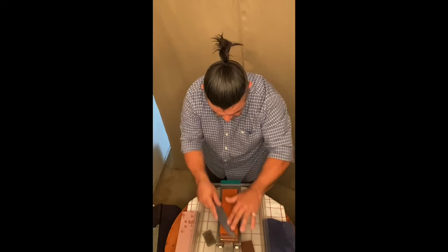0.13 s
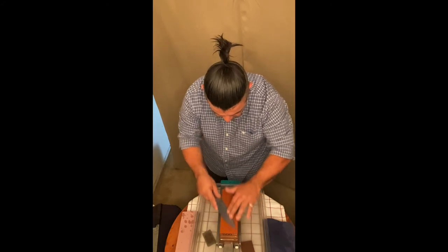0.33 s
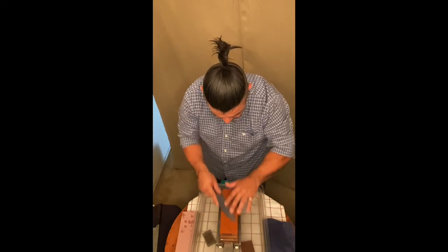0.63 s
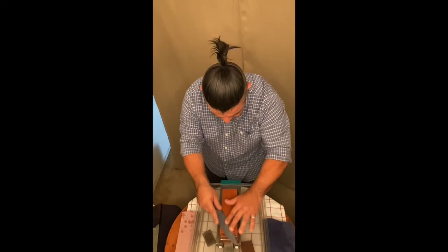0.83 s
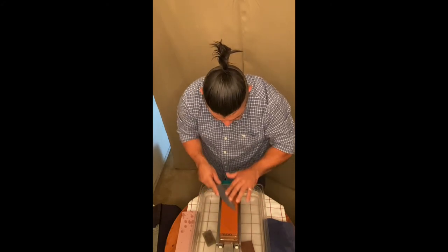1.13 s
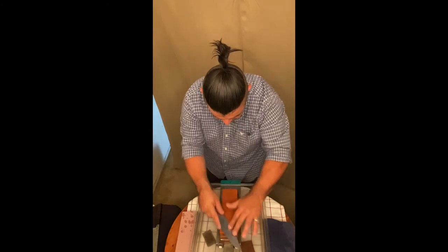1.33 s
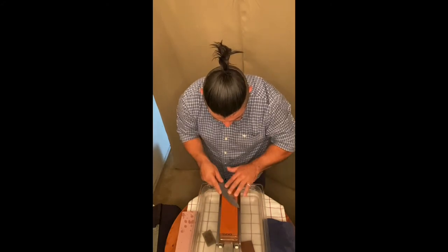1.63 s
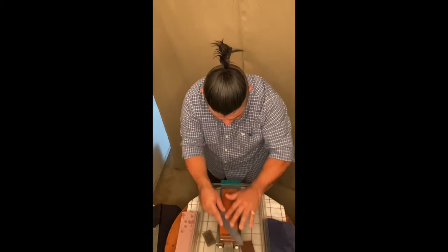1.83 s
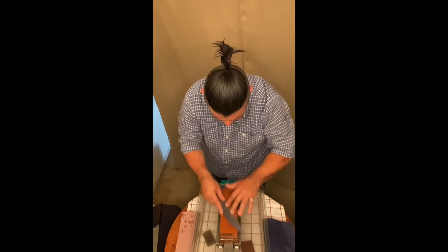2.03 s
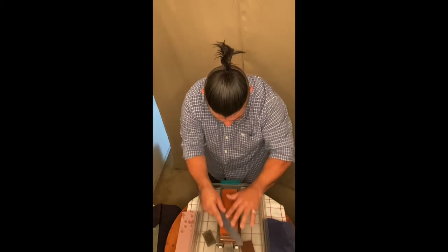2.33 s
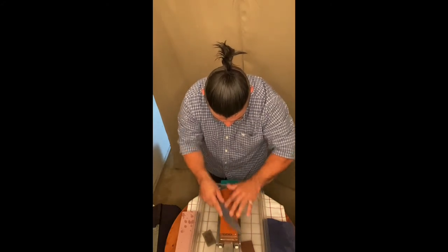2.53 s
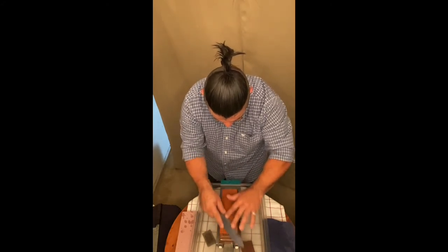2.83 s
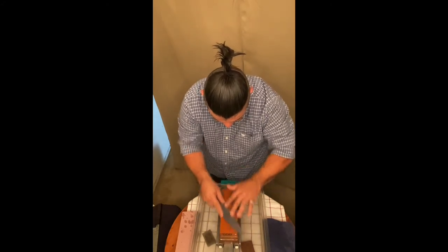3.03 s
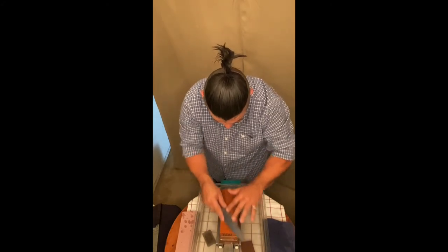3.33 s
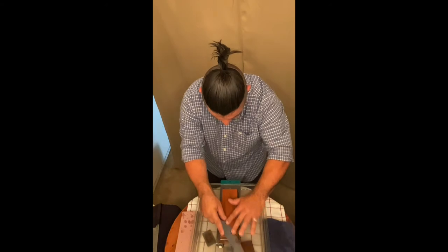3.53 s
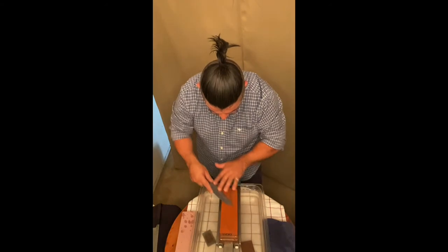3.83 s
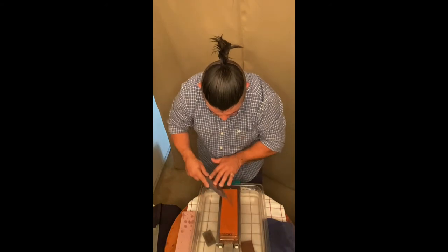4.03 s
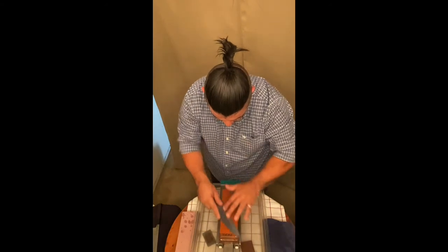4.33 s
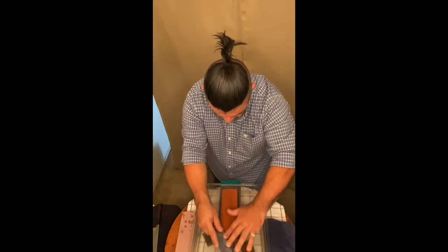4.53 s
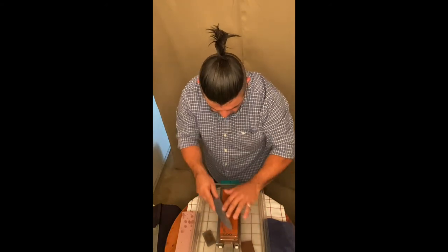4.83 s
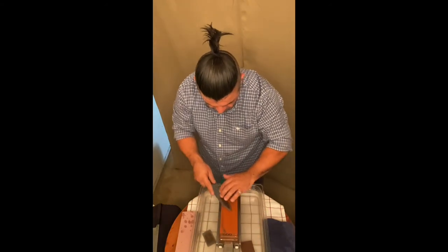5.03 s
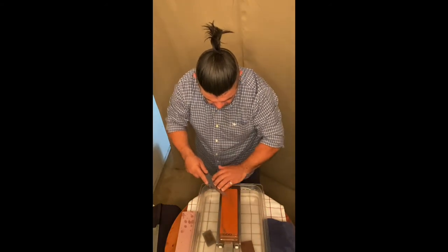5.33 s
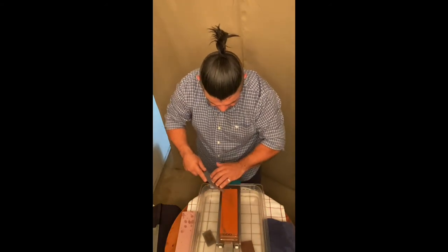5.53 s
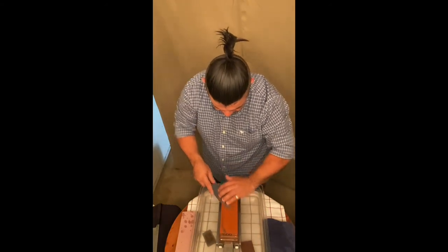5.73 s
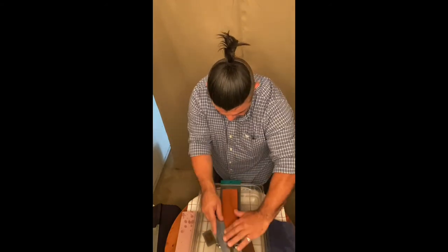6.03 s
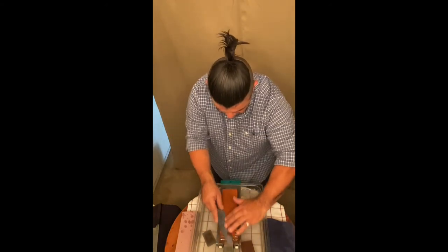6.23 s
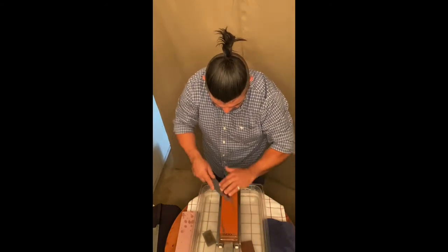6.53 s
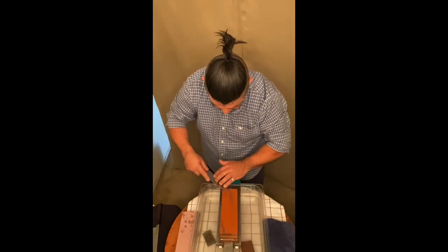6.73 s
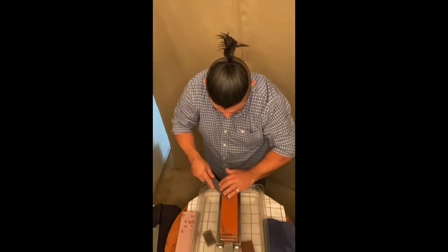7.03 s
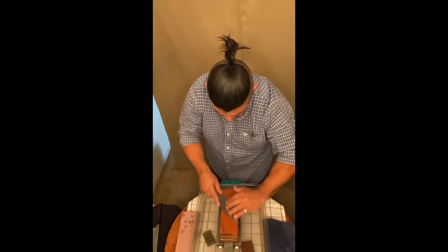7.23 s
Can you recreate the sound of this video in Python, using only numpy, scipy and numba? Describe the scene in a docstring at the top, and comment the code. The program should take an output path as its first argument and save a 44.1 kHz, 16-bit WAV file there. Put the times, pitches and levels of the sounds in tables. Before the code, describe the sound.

A close phone in a small indoor room hears a knife worked on a wet whetstone. From 0 to about 3.5 s the strokes come steadily, one every 0.25 to 0.3 s: bright gritty hiss, a wavering metallic ring around 3 to 5 kHz, tiny squeaks, and a brief dip at each turn. Soft stone knocks appear near 0.5, 1.8 and, more clearly, 3.5 s. Strokes loosen around 4 s, and the blade lifts at 4.6 s, leaving room hush and a very faint rustle. It lands at 5.1 s with a dull knock; slower, softer, duller-ringing strokes follow, roughly every 0.35 s, growing stronger by 7.1 s and continuing to the end at 7.4 s. Beneath, street rumble and a deep engine drone climb in pitch until nearly 7 s, then ease; a second, farther engine slows late. A faint low hum swells around 2.75 s.

```python
"""A knife edge hisses and rings over a wet whetstone, stroke after stroke, with one lift and landing.
Grit noise drives drifting blade modes and short squeaks; the stone knocks in its holder.
Behind: an engine speeds up and later eases, a second slows, street rumble fills the room's low modes.
Room noise, one faint rustle and one hum complete the scene; a phone with two ports hears it."""
import sys
import numpy as np
from scipy import signal
from scipy.fft import rfft, irfft
from scipy.io import wavfile
from scipy.ndimage import uniform_filter1d
from numba import njit

SR = 44100
rng = np.random.default_rng(int(sys.argv[2]) if len(sys.argv) > 2 else 0)


def materialize(psi):
    """Save the field psi as 16-bit PCM at rate SR to the path in sys.argv[1].

    A 1-D psi becomes a single channel; in a 2-D psi each row is a channel.
    """
    bounded = np.clip(np.atleast_2d(psi).T, -1, 1)
    quanta = np.round(bounded * 32767).astype(np.int16)
    wavfile.write(sys.argv[1], SR, quanta)


N = 325899
TIME_S = np.arange(N) / SR

# strokes, each from its opening turn: (time [s], halt depth [dB], slowing before the halt [s],
# hiss at start, middle, end [relative dB], ring at start, middle, end [relative dB],
# low blade modes [relative dB], hiss brightness: treble up and the rest down [dB])
STROKES = [(0, 0, 0, -52, -59.5, -47, -50, -62, -54, -4.5, 2.5),
           (0.207, 16, 0.046, -48.5, -59, -56, -62, -63, -58, 0, -7),
           (0.49, 15.5, 0.065, -54.5, -56.5, -54.5, -62.5, -57.5, -56.5, -2.5, 0.5),
           (0.793, 11, 0.02, -50, -60.5, -55.5, -60, -55, -52.5, -7.5, -5),
           (1.073, 10, 0.032, -52, -54.5, -51.5, -56, -58, -52, -1.5, 0),
           (1.352, 12, 0.017, -52, -57, -49, -58, -49, -53.5, -7.5, -5),
           (1.621, 11, 0.027, -49, -48.5, -54, -63, -50, -51.5, 2.5, 1.5),
           (1.902, 14, 0.014, -53.5, -54, -45, -52, -52.5, -54.5, 1.5, -2),
           (2.16, 15.5, 0.027, -49.5, -51.5, -55.5, -57, -62, -51, 1, -2.5),
           (2.406, 12, 0.023, -51.5, -57.5, -43.5, -56.5, -54, -53.5, -5, 1),
           (2.658, 13, 0.027, -48, -54.5, -56.5, -53, -55.5, -47, -0.5, -1),
           (2.908, 13, 0.02, -51.5, -51.5, -45.5, -50, -52.5, -54, -2, 1),
           (3.167, 13.5, 0.018, -46.5, -55, -56.5, -52, -66.5, -53.5, 7, 1),
           (3.482, 8, 0.03, -57.5, -53.5, -57.5, -51, -53, -56, -2, -5.5),
           (3.79, 1.5, 0.07, -58, -60, -53.5, -60, -60.5, -63.5, -1, 3),
           (3.976, 15.5, 0.064, -61, -61, -61, -60, -55, -65.5, -1, -5),
           (4.096, -2, 0.033, -54, -50, -60, -75, -51, -60, 0.5, 4),
           (5.075, 50, 0.078, -54.5, -54.5, -61, -61, -89, -57.5, 10, 4),
           (5.478, 22, 0.046, -71, -65.5, -59, -66.5, -63, -64, -1, 11.5),
           (5.71, 1, 0.055, -52, -52, -53.5, -61, -52, -54.5, 7, 5.5),
           (6.086, 18, 0.034, -54, -51.5, -55, -55, -53, -54.5, 2, -1.5),
           (6.405, 4, 0.035, -58.5, -53, -60, -59.5, -62.5, -60.5, 6, 3.5),
           (6.785, 16, 0.068, -69.5, -55.5, -53, -62.5, -71, -57.5, -2, -3),
           (7.106, 5, 0.047, -48, -54.5, -55, -52, -49, -51, -2, 4.5)]
# grit hiss colour: (frequency [Hz], density [relative dB per Hz])
GRIT_COLOUR = [(600, -19), (1800, -23.5), (3000, -13.5), (4000, -16.5), (5500, -5.5), (7000, -4.5),
               (10000, -1.5), (12500, -6), (14500, -8.5), (16000, -7)]
# modes of the blade under the fingers: (frequency [Hz], width [Hz], level [relative dB])
BLADE_MODES = [(1199, 66, -19), (2190, 57, -26), (2470, 81, -11), (2844, 88, -2), (3187, 170, 0.5),
               (3500, 180, 0), (3847, 56, -2.5), (4170, 180, 0.5), (4440, 43, 0), (5044, 33, -6),
               (6090, 370, -5.5)]
# edge catches, one mode sings: (centre time [s], length [s], pitch [Hz], level before its bell [dB])
SQUEAKS = [(0.125, 0.042, 3870, -57.5), (0.731, 0.031, 3970, -48.5), (1.326, 0.052, 3600, -55.5),
           (1.523, 0.027, 3550, -55), (1.767, .03, 4800, -51), (1.772, 0.032, 3000, -56),
           (1.88, 0.15, 1163, -60.5), (2.18, 0.038, 3330, -54), (2.55, 0.046, 3260, -48.5),
           (2.787, 0.041, 4436, -53), (3.035, 0.083, 4350, -59), (3.32, 0.058, 4480, -51.5),
           (3.455, 0.041, 3800, -51.5), (4.412, 0.06, 4510, -50.5), (2.46, 0.059, 2980, -54),
           (4.444, 0.055, 2410, -58), (0.045, 0.048, 5150, -56.5), (0.524, 0.016, 4150, -60),
           (1.095, 0.031, 5000, -58), (1.3, .04, 6300, -55), (1.594, 0.079, 3430, -57),
           (1.65, 0.022, 4420, -52), (2.072, 0.025, 2960, -52.5), (2.264, 0.08, 4380, -57),
           (2.387, 0.015, 4400, -54), (2.638, 0.044, 2910, -59), (2.67, 0.035, 3270, -58),
           (3.152, 0.063, 3000, -59.5), (3.11, 0.047, 5076, -71), (3.22, 0.071, 5040, -58),
           (3.48, 0.076, 2700, -60), (3.748, 0.04, 5080, -53), (4.32, 0.065, 4820, -56),
           (5.145, 0.039, 4700, -66), (5.262, 0.11, 4590, -65), (5.378, .06, 5520, -65),
           (5.53, 0.028, 5550, -63.5), (5.615, 0.042, 5700, -64), (5.854, 0.067, 4275, -56),
           (6.104, 0.016, 2310, -56.5), (6.114, .02, 2750, -60), (6.173, 0.025, 5360, -57),
           (6.225, 0.03, 4140, -54), (6.507, 0.038, 4530, -62), (6.594, 0.069, 5000, -58),
           (6.694, 0.04, 4995, -56.5), (7.06, 0.048, 4500, -63), (5.834, 0.053, 4865, -55),
           (7.27, 0.05, 4500, -58)]
# edge bites a coarser patch, whole rasp surges: (centre time [s], length [s], level [dB])
SURGES = [(0.115, 0.038, 7), (0.232, .025, 0), (0.52, .02, 1), (.813, 0.025, 1), (1.123, 0.031, 3.5),
          (1.31, 0.037, 0), (1.525, 0.016, 5.5), (1.583, .04, 2), (1.77, 0.053, 2), (2.123, .05, -0.5),
          (2.536, 0.039, 6), (2.715, 0.046, 3), (2.793, 0.038, 6.5), (3.049, 0.032, 5), (3.295, 0.072, 4.5),
          (3.519, 0.037, 3), (3.646, 0.024, 4), (4.181, 0.042, 5), (4.332, 0.068, 3), (4.42, 0.044, 2.5),
          (5.241, 0.041, 3), (5.665, .03, 2), (5.82, 0.082, 5), (6.186, .06, 1.5), (6.339, 0.027, 3),
          (6.493, 0.03, 3), (6.69, 0.041, 3.5), (7.225, 0.084, 4.5)]
# modes of stone and holder: (frequency [Hz], level [relative dB], t60 [s])
HOLDER_MODES = [(486, 7, 0.015), (737, -4.5, 0.039), (1297, -3.5, 0.058), (1604, -4, 0.022),
                (2120, -3.5, 0.0075), (2840, -0.5, 0.006)]
# stone shifts in the holder: (time [s], level [relative dB], rattle decay [s], pitch [Hz])
KNOCKS = [(0.513, -62, 0.013, 650), (0.8, -66.5, 0.028, 1480), (1.787, -63, 0.47, 850),
          (2.019, -72, 0.038, 900), (3.463, -55.5, 0.015, 597), (3.47, -63, 0.022, 1576),
          (3.484, -59, 0.034, 745), (4.004, -66.5, 0.037, 1575), (4.008, -61.5, 0.041, 752),
          (4.286, -70, 0.085, 1240), (5.088, -51, 0.016, 760), (5.091, -62, 0.009, 1325),
          (5.81, -57.5, 0.07, 870), (6.107, -69, 0.017, 2500), (6.343, -70, 0.072, 530),
          (6.634, -65, 0.07, 1866)]
# engine outside: (time [s], firing rate [Hz], level [dB])
ENGINE = [(0, 45.7, -51.5), (.8, 46.72, -72), (1.3, 48.23, -42.5), (1.8, 53.1, -37.5), (2.3, 54.58, -42),
          (2.9, 57.23, -44), (3.3, 64.34, -42), (3.8, 68.13, -43.5), (4.4, 71.02, -43), (5, 72.3, -47.5),
          (5.6, 73.75, -51), (6.2, 74.8, -57), (6.8, 77.4, -48.5), (7.1, 68.8, -47.5), (7.39, 68.3, -67)]
# second engine, further off: (time [s], firing rate [Hz], level [dB])
FAR_ENGINE = [(5.1, 72.1, -90.5), (5.7, 70, -63), (6.8, 66.3, -47.5), (7.1, 62.9, -75)]
# low room modes: (frequency [Hz], width [Hz], level [relative dB])
ROOM_MODES = [(46.74, 1.75, -4), (55, 4.5, -6.5), (58.83, 5.1, -3.5), (80.06, 0.73, -9.5)]
# street rumble: (time [s], level [dB])
RUMBLE_LEVEL = [(0, -52.5), (.6, -42), (1.2, -45.5), (3, -48), (4.5, -42.5), (5.2, -44.5), (6, -43),
                (6.6, -47.5), (7.39, -50)]
# room air colour: (frequency [Hz], density [relative dB per Hz])
AIR_COLOUR = [(50, -14), (85, -1.5), (108, -14), (140, -24), (181, -24.5), (280, -17.5), (347, -29),
              (535, -26), (584, -33.5), (650, -31.5), (1050, -37.5), (1840, -41), (6310, -64.5),
              (15000, -69)]
# microphone ports: (frequency [Hz], phase lead of the left [rad], likeness [0-1])
PORTS = [(100, 0, .997), (200, 0, .9), (350, 0, .72), (700, .5, .15), (1500, 0, .45), (2300, .3, .4),
         (3100, 2.8, .45), (3900, .5, .5), (5100, .7, .6), (6000, 1.7, .85), (7300, 3.14, .995),
         (10450, 6.28, .94), (12000, 7.85, .9), (13700, 9.42, .995), (16000, 12.1, .85)]

# strokes: rest after the turn, then time to regain speed; row that lands after the lift
HALT_S, PICKUP_S, LIFT_S, LANDING_ROW = 0.0067, 0.011, 4.58, 17
# the ring bridges part of the halt; share of the stroke where it has its middle level
RING_HALT_SHARE, RING_MIDDLE_SHARE = 0.56, 0.56
# the harder the blade rings over the hiss, the lower the contact centre
CONTACT_BASE_HZ, CONTACT_HZ_PER_DB = 4820, 35
# heel and tip: fingers hold the low modes; the middle is ground from MIDDLE_S to the lift
MIDDLE_S, OUTER_LOW_DB = 1.75, -2
# tip: narrow modes fade per octave of sharpness; modes wander more
TIP_DAMP_DB_PER_OCT, MODE_DRIFT_SHARE, TIP_DRIFT_SHARE = 5, 0.013, 0.025
# broad tip rasp, level relative to the ring
TIP_RASP_REL_DB, TIP_RASP_HZ, TIP_RASP_WIDTH_HZ = -12, 4490, 2800
# pitch over width; climb over one length as a share of pitch
SQUEAK_Q, SQUEAK_RISE_SHARE = 26, 0.027
# knock loss for modes above and below its pitch
KNOCK_ABOVE_DB_PER_OCT, KNOCK_BELOW_DB_PER_OCT = 14, 26
AIR_BASE_DB, AIR_RISE_DB_PER_S = -55, 0.35
AIR_SWELL_S, AIR_SWELL_LENGTH_S, AIR_SWELL_DB = 5.08, 1.45, 1
# rustle and hum levels are taken before their bells
RUSTLE_S, RUSTLE_LENGTH_S, RUSTLE_HZ, RUSTLE_BASE_DB = 4.82, 0.26, 4000, -81
HUM_S, HUM_LENGTH_S, HUM_HZ, HUM_BASE_DB = 2.75, 0.5, 255, -61.5
TOP_HZ = 15760


def undb(db):
    """Amplitude gain of a level in dB."""
    return 10 ** (np.asarray(db) / 20)


def level(x, db):
    """Set the rms in dB."""
    return x * undb(db) / np.sqrt(np.mean(x ** 2))


def curves(table):
    """Columns after time, interpolated to one value a sample."""
    time_s, *columns = np.transpose(table)
    return [np.interp(TIME_S, time_s, c) for c in columns]


def colour(x, spectrum):
    """Shape a spectrum, linear in dB over log frequency."""
    hz, db = np.transpose(spectrum)
    bins_hz = np.fft.rfftfreq(N, 1 / SR) + 1
    gain = undb(np.interp(np.log(bins_hz), np.log(hz), db))
    return irfft(rfft(x) * gain, N)


def ring(x, hz, width_hz):
    """One fixed resonance, gain 1 at its centre."""
    return signal.lfilter(*signal.iirpeak(hz, hz / width_hz, fs=SR), x)


@njit
def glide(x, hz, width_hz):
    """State-variable resonance with a moving centre, gain 1 there."""
    y, band, low = np.empty(len(x)), 0., 0.
    for i in range(len(x)):
        g = np.tan(np.pi * hz[i] / SR)
        k = width_hz / hz[i]
        v = (band + g * (x[i] - low)) / (1 + g * (g + k))
        band = 2 * v - band
        low = low + 2 * g * v
        y[i] = k * v
    return y


def walk(rate_hz):
    """Random levels held 1 / rate_hz, slewed twice; spread near 1."""
    k = int(SR / rate_hz)
    held = np.repeat(rng.standard_normal(N // k + 1), k)
    return 1.28 * uniform_filter1d(uniform_filter1d(held, k), k)[:N]


def swell(time_s, length_s):
    """Bell-shaped rise and fall."""
    return np.exp(-2 * ((TIME_S - time_s) / length_s) ** 2)


def ports(source):
    """Both ports hear the source; the right one later, and partly by other paths."""
    direct, other = rfft(source()), rfft(source())
    hz, lead_rad, likeness = np.transpose(PORTS)
    bins_hz = np.fft.rfftfreq(N, 1 / SR)
    lead_rad = np.interp(bins_hz, hz, lead_rad)
    likeness = np.clip(np.interp(bins_hz, hz, likeness), 0, 1)
    same = np.sqrt((1 + likeness) / 2) * direct
    apart = np.sqrt((1 - likeness) / 2) * other
    left, right = same + apart, (same - apart) * np.exp(-1j * lead_rad)
    return irfft(np.array([left, right]), N)


def knife():
    """Grit under the edge hisses and drives blade modes, strongest near a moving contact centre."""
    hiss_db, ring_db, low_db, bright_db, touching = strokes()
    contact_hz = CONTACT_BASE_HZ * (1 + 0.074 * walk(5.5))
    contact_hz = contact_hz - CONTACT_HZ_PER_DB * np.clip(ring_db - hiss_db, -15, 15)
    tip = TIME_S > LIFT_S
    low_db = low_db + OUTER_LOW_DB * (tip | (TIME_S <= MIDDLE_S))
    # fingers and contact travel along the blade: each mode swells and drifts by itself
    grips = []
    for hz, width_hz, db in BLADE_MODES:
        low_weight = max(1.67 * np.log2(4800 / hz) * (hz < 4000), 0)
        tip_loss_db = tip * TIP_DAMP_DB_PER_OCT * np.log2(hz / width_hz / 12)
        grips.append(undb(db + 2.85 * walk(24) + low_db * low_weight - tip_loss_db))
    drift = np.where(tip, TIP_DRIFT_SHARE, MODE_DRIFT_SHARE)
    tunings_hz = [hz * (1 + drift * walk(9)) for hz, _, _ in BLADE_MODES]
    surge = undb(sum(db * swell(s, length_s) for s, length_s, db in SURGES))
    # uneven slurry: wide parts of the hiss come and go
    patches = [(hz * (1 + 0.16 * walk(5.5)), 0.1 * walk(13)) for hz in 4500 * 1.35 ** np.arange(5)]
    # single grains: narrow parts flicker fast
    grains = [(hz, 0.57 * walk(40)) for hz in 2700 * 1.1 ** np.arange(18)]

    def sound():
        rub = grit(scatter_db=2.0, catch_db=0.96)
        hiss = level(colour(rub, GRIT_COLOUR), 2.72)
        hiss = hiss + sum(share * glide(hiss, hz, 1450.0) for hz, share in patches)
        hiss = hiss + sum(share * ring(hiss, hz, hz / 19.0) for hz, share in grains)
        hiss = brighten(hiss, bright_db)
        modes = np.zeros(N)
        for grip, hz, (_, width_hz, _) in zip(grips, tunings_hz, BLADE_MODES):
            modes += grip * glide(rub, hz, 1.0 * width_hz) / np.sqrt(width_hz)
        contact = glide(glide(rub, contact_hz, 700.0), contact_hz, 700.0)
        rasp = ring(ring(rub, TIP_RASP_HZ, TIP_RASP_WIDTH_HZ), TIP_RASP_HZ, TIP_RASP_WIDTH_HZ)
        blade = level(modes, -3.45) + level(contact, -13) + tip * level(rasp, TIP_RASP_REL_DB)
        return touching * surge * (undb(hiss_db) * hiss + undb(ring_db) * blade) + squeaks(rub)
    return ports(sound)


def strokes():
    """Hiss and ring run through each stroke and drop where the blade halts to turn; one lift."""
    start_s, depth_db, slowing_s, *columns = np.transpose(STROKES)
    end_s = np.append(start_s[1:], TIME_S[-1])
    end_s[LANDING_ROW - 1] = LIFT_S
    # a stroke ends in the halt of the next row
    brake_s = end_s - np.append(slowing_s[1:], 0)
    drop_db = np.append(depth_db[1:], 0)

    def run(first, middle, last, halt_share, middle_share):
        rest_s = start_s + HALT_S
        middle_s = start_s + middle_share * (brake_s - start_s)
        times_s = np.transpose([rest_s, rest_s + PICKUP_S, middle_s, brake_s, end_s]).ravel()
        halt = last - halt_share * drop_db
        before = np.append(first[0], halt[:-1])
        return np.interp(TIME_S, times_s, np.transpose([before, first, middle, last, halt]).ravel())

    hiss_db = run(*columns[:3], 1, 0.55)
    ring_db = run(*columns[3:6], RING_HALT_SHARE, RING_MIDDLE_SHARE)
    low_db, bright_db = (np.interp(TIME_S, (start_s + end_s) / 2, c) for c in columns[6:])
    touching = (TIME_S < LIFT_S) | (TIME_S > start_s[LANDING_ROW])
    return hiss_db, ring_db, low_db, bright_db, touching


def grit(scatter_db, catch_db):
    """Dense tiny impacts of uneven size; the edge bites suddenly into coarser patches, slides free."""
    bites = uniform_filter1d((rng.random(N) < 25 / SR) * rng.random(N), size=200)  # about 25 a second
    catch = signal.lfilter([1], [1, -np.exp(-1 / (0.052 * SR))], bites)  # 52 ms decay
    size_db = scatter_db * rng.exponential(1, N) + catch_db * catch / catch.std()
    return level(undb(size_db) * rng.standard_normal(N), 0)


def brighten(hiss, bright_db):
    """Tilt about the low-pass split: treble up, the rest down by the same dB."""
    dull = signal.filtfilt(*signal.butter(1, 10000, fs=SR), hiss)
    return undb(-bright_db) * dull + undb(bright_db) * (hiss - dull)


def squeaks(rub):
    """The edge catches: rub noise through one climbing resonance under a bell."""
    out = np.zeros(N)
    for s, length_s, hz, db in SQUEAKS:
        span = slice(max(int((s - 2 * length_s) * SR), 0), int((s + 2 * length_s) * SR))
        place = (TIME_S[span] - s) / length_s
        note = glide(rub[span], hz * (1 + SQUEAK_RISE_SHARE * place), hz / SQUEAK_Q)
        out[span] += level(note, db) * np.exp(-2 * place ** 2)
    return out


def stone():
    """Each shift is a soft, dying noise rattle into the stone and holder modes nearest its pitch."""
    age_s = np.arange(SR // 3) / SR

    def sound():
        out = np.zeros(N)
        for hz, db, t60_s in HOLDER_MODES:
            force = np.zeros(N + len(age_s))
            for s, knock_db, length_s, knock_hz in KNOCKS:
                attack = 1 - np.exp(-age_s / 0.0018)
                decay = np.exp(-age_s / max(length_s, 0.004)) + 0.96 * np.exp(-age_s / 0.0012)
                above_db = KNOCK_ABOVE_DB_PER_OCT * max(np.log2(hz / knock_hz), 0)
                below_db = KNOCK_BELOW_DB_PER_OCT * max(np.log2(knock_hz / hz), 0)
                force[int(s * SR):][:len(age_s)] += undb(knock_db - above_db - below_db) * attack * decay
            width_hz = np.log(1000) / np.pi / t60_s
            out += undb(db + 29.5) * ring(force[:N] * rng.standard_normal(N), hz, width_hz)
        return out
    return ports(sound)


def engine(table, second_db, high_db, follow):
    """Firing tone; three upper orders follow a share of its swells; pitch and strength waver."""
    hz, db = curves(table)
    phase = 2 * np.pi * np.cumsum(hz * (1 + 0.00971 * walk(6))) / SR
    swell_db = follow * (db - db.max())
    high = (high_db + swell_db, 4.5)
    orders = [(db, 1.5), (second_db + swell_db, 5.0), high, high]  # (level [dB], waver [dB])
    tone = np.zeros(N)
    for order, (order_db, waver_db) in enumerate(orders, 1):
        tone += undb(order_db + waver_db * walk(9)) * np.sin(order * phase)
    return np.sqrt(2) * tone


def rumble():
    """Low street noise, heard mostly at the room's lowest modes."""
    modes = sum(undb(db) * level(ring(rng.standard_normal(N), hz, w), 0) for hz, w, db in ROOM_MODES)
    steep = signal.butter(2, [28, 85], "bandpass", fs=SR, output="sos")
    return undb(curves(RUMBLE_LEVEL)[0]) * level(signal.sosfilt(steep, modes), 0)


def air():
    """Dull room noise that rises slowly, swells once and wavers."""
    swell_db = AIR_SWELL_DB * swell(AIR_SWELL_S, AIR_SWELL_LENGTH_S)
    gain = undb(AIR_RISE_DB_PER_S * TIME_S + swell_db + 0.64 * walk(1.79))
    closed = [(60, -60.0)] + list(AIR_COLOUR)  # cut below 60 Hz
    flicker = [(hz, 0.32 * walk(3.5)) for hz in 110 * 1.3 ** np.arange(6)]  # low bands come and go

    def sound():
        hush = gain * level(colour(rng.standard_normal(N), closed), AIR_BASE_DB)
        return hush + sum(share * ring(hush, hz, hz / 3.94) for hz, share in flicker)
    return ports(sound)


def rustle():
    """Sleeve and fingers move during the lift: faint patchy noise, broad around its centre."""
    patchy = swell(RUSTLE_S, RUSTLE_LENGTH_S) * undb(1.5 * walk(25))

    def sound():
        cloth = grit(scatter_db=2.5, catch_db=6)
        cloth = ring(ring(cloth, RUSTLE_HZ, 3000.0), RUSTLE_HZ, 3000.0)
        return patchy * level(cloth, RUSTLE_BASE_DB)
    return ports(sound)


def hum():
    """Narrow-band noise: a low wavering hum that swells once."""
    return swell(HUM_S, HUM_LENGTH_S) * level(ring(rng.standard_normal(N), HUM_HZ, 11.0), HUM_BASE_DB)


def scene():
    """Bench close by; engines, rumble and hum alike in both ports."""
    near = engine(ENGINE, second_db=-63.0, high_db=-76, follow=0.15)
    far = engine(FAR_ENGINE, second_db=-61.5, high_db=-72.5, follow=0.6)
    return knife() + stone() + air() + near + far + rumble() + rustle() + hum()


def record(dry):
    """The phone cuts the top: steep elliptic low-pass."""
    return signal.sosfilt(signal.ellip(14, 0.3, 80, TOP_HZ, fs=SR, output="sos"), dry)


dry = scene()
out = record(dry)
materialize(out)
```